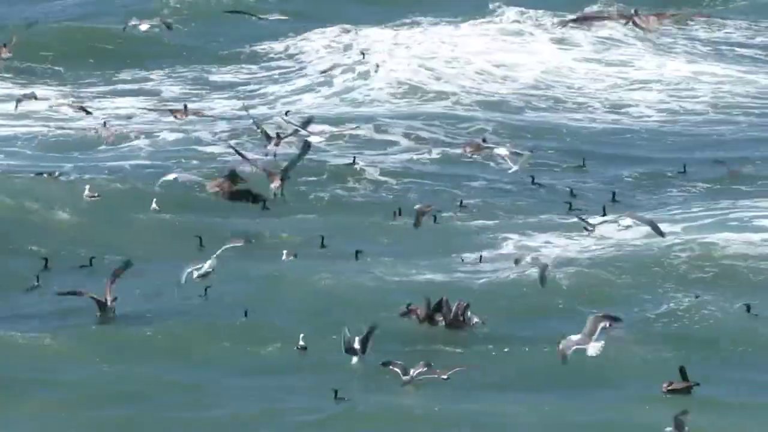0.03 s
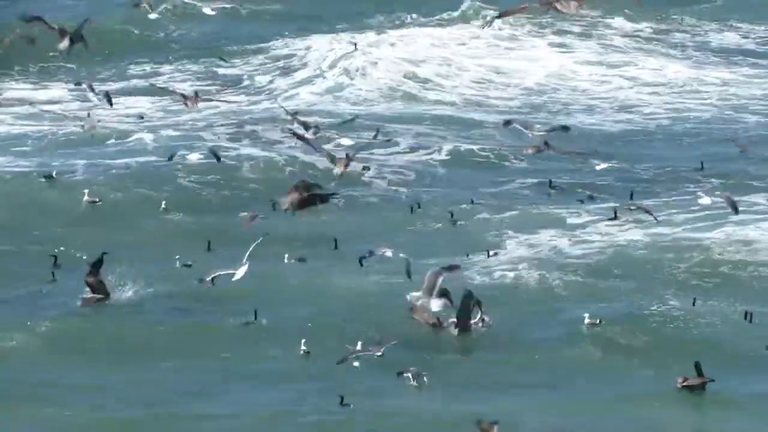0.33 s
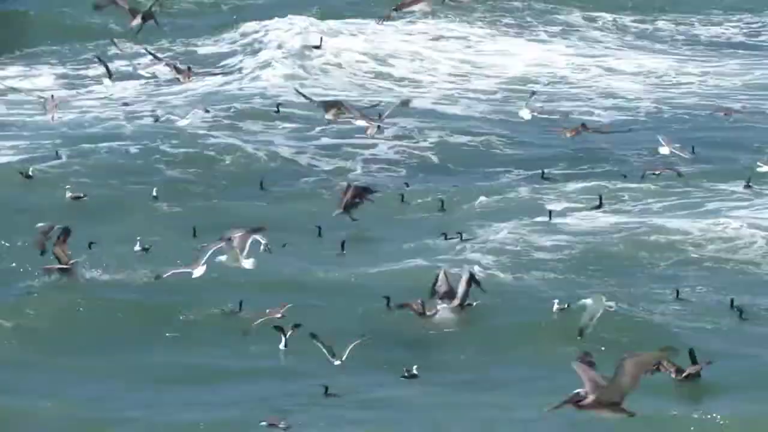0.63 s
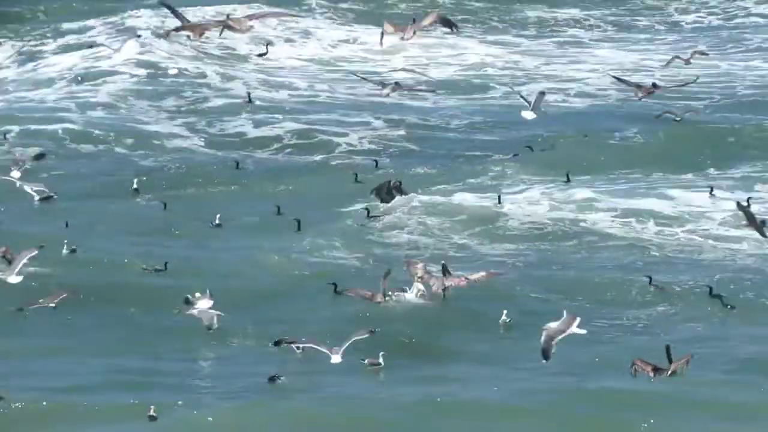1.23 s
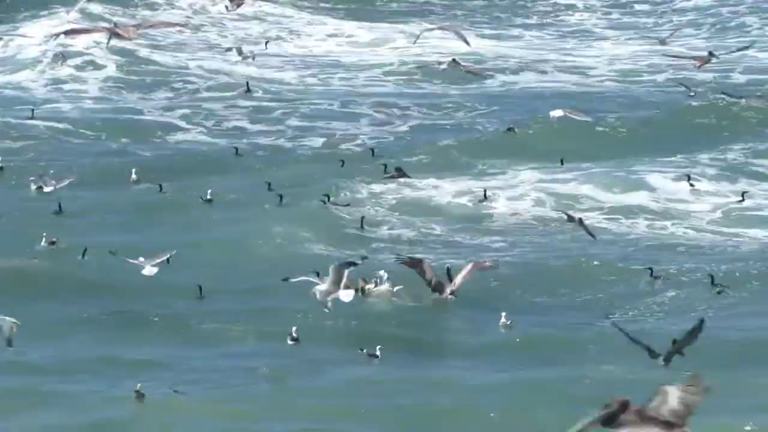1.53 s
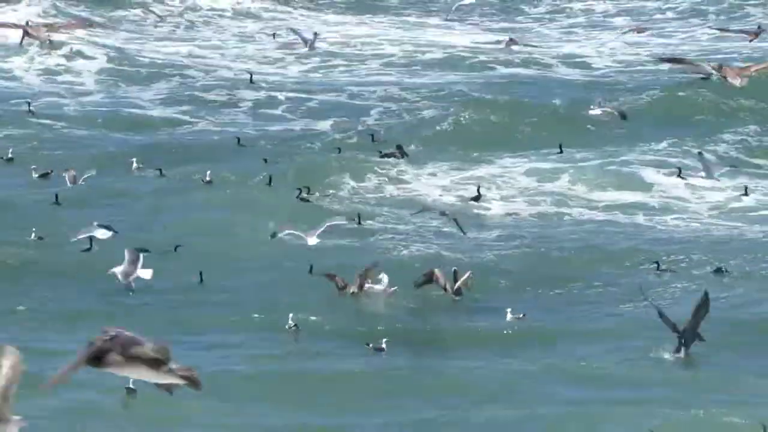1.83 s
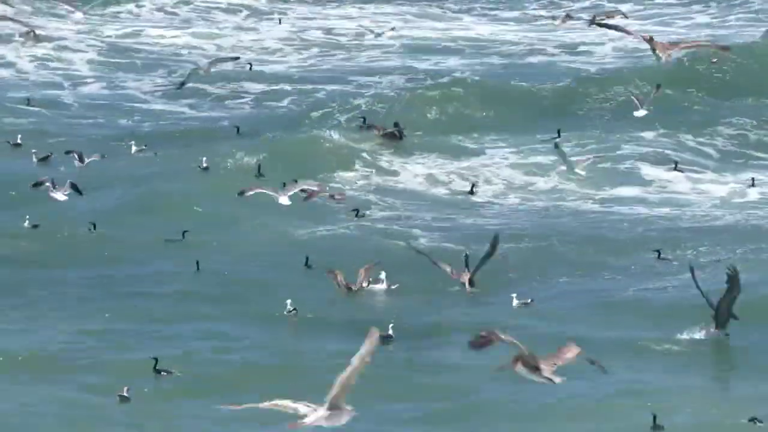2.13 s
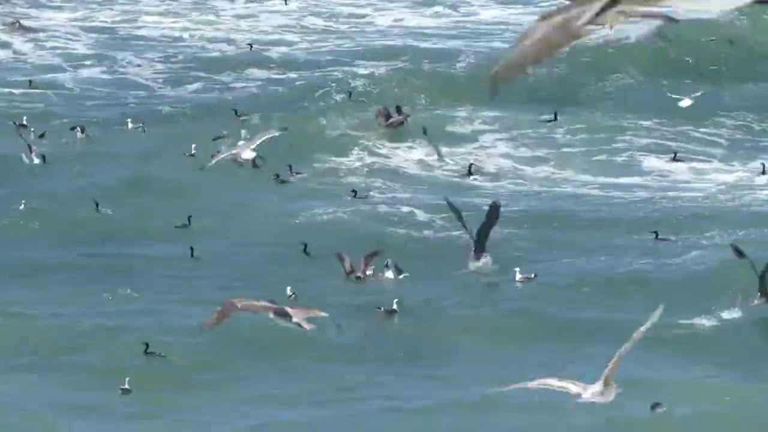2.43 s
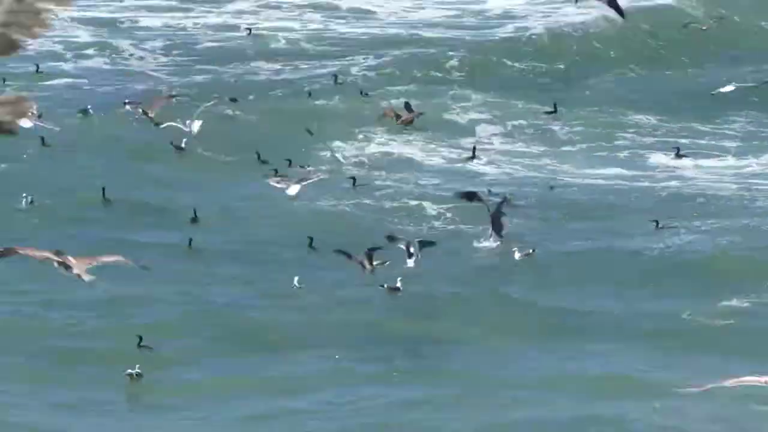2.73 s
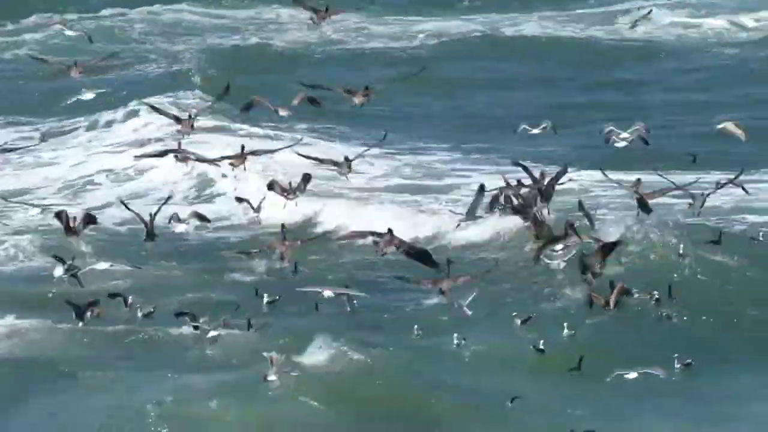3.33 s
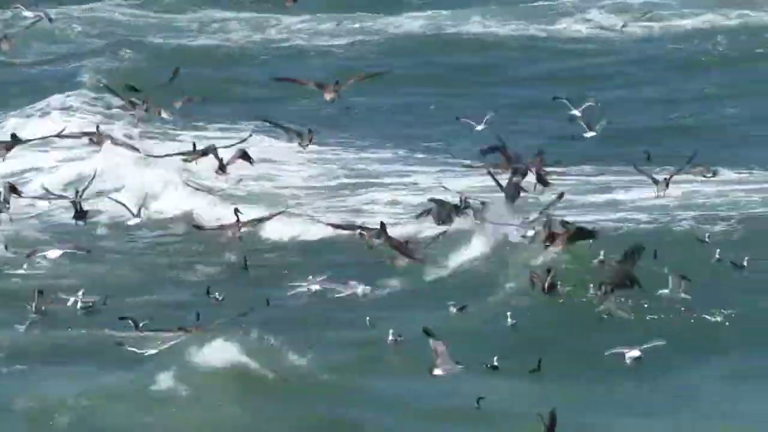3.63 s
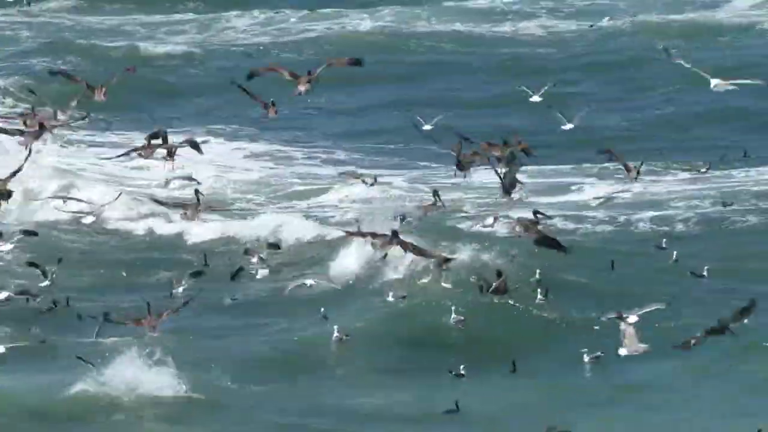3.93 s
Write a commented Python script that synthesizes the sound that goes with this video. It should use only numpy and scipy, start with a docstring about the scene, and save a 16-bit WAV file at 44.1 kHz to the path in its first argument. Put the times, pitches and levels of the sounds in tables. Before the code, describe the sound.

Wind rumbles and thumps on the microphone over the steady wash of distant breaking waves.

```python
"""A shore where seabirds feed, heard through a stereo microphone out in gusty wind.
Eddies buffet the microphone, rumbling in nearly opposite phase left and right, brighter in strong gusts.
Farther off, breakers roar and their foam hisses; three faint bird calls carry over the water.
The recorder drops out for a fifth of a second and returns on the louder splash of a nearer wave."""
import sys
import numpy as np
from scipy import signal
from scipy.fft import rfft, irfft
from scipy.io import wavfile
from scipy.ndimage import uniform_filter1d, minimum_filter1d

SR = 44100
rng = np.random.default_rng(int(sys.argv[2]) if len(sys.argv) > 2 else 0)


def master_out(mix):
    """Clip the mix to full scale and print it as 16-bit PCM to the path in sys.argv[1]."""
    frames = np.transpose(np.atleast_2d(mix))
    ceiling = np.clip(frames, -1, 1)
    pcm = np.round(ceiling * 32767).astype(np.int16)
    wavfile.write(sys.argv[1], SR, pcm)


N = 176400
DROPOUT_FROM_S, DROPOUT_TO_S = 2.637, 2.839
OPPOSITE = np.array([[1], [-1]])  # signs for left and right


def wind(t):
    """Gusts on the microphone drive a deep throb, a rumble and, more steeply, a rasp of small eddies."""
    # wind strength at the microphone: t/s, level/dB
    gust_level = [(0, -32.5), (.1, -30.5), (.16, -28.5), (.3, -25.5), (.38, -26.5), (.5, -21), (.55, -26),
                  (.63, -20.5), (.7, -19), (.77, -18), (.84, -23.5), (.95, -24), (1.03, -22), (1.09, -20),
                  (1.235, -17.5), (1.28, -26.5), (1.35, -20.5), (1.39, -20.5), (1.44, -22), (1.61, -28),
                  (1.91, -28), (1.99, -30), (2.13, -19.5), (2.3, -18), (2.38, -26), (2.44, -20),
                  (2.51, -28), (2.64, -27.5), (2.84, -21), (2.94, -16.5), (2.985, -20), (3.08, -22),
                  (3.13, -23.5), (3.26, -30), (3.3, -19), (3.38, -22.5), (3.46, -20), (3.535, -16),
                  (3.56, -19.5), (3.72, -24.5), (3.8, -18.5), (3.875, -26.5), (3.91, -20), (4.0, -20.5)]
    # side the wind favours: t/s, left minus right/dB
    wind_lean = [(0, -3.5), (.4, 0), (.8, -3), (1.15, -1), (1.4, -3), (1.75, -5.5), (2.15, 1.5), (2.45, -5),
                 (2.85, -6), (3.4, -5.5), (3.6, -4), (4.0, -7)]
    # spectra of the three wind bands: f/Hz, relative density/dB
    throb_spectrum = [(20, -20), (45, -3), (80, 0), (130, -6), (250, -9)]
    rumble_spectrum = [(12, -30.5), (22, -13), (45, -5.5), (80, -2.5), (130, -1.5), (230, -4.5), (400, -13),
                       (560, -26), (800, -27), (1400, -55.5)]
    rasp_spectrum = [(120, -25.5), (300, 5.5), (500, 0.5), (700, -9), (1000, -17.5), (1500, -34),
                     (3000, -41.5), (6000, -56.5)]
    gust_db = curve(gust_level)
    late = t > DROPOUT_FROM_S  # after the dropout: more throb, less rumble and rasp
    throb = turbulence(throb_spectrum) * undb(gust_db + np.where(late, 0, -7.5))
    rumble = turbulence(rumble_spectrum) * undb(gust_db + np.where(late, 1.61, 2.65))
    pivot_db, rasp_growth = -21, 1.4  # growth in dB of rasp per dB of gust
    rasp_db = pivot_db + rasp_growth * (gust_db - pivot_db) + np.where(late, -11, -5.5)
    rasp = turbulence(rasp_spectrum, flutter_db=7) * undb(rasp_db)
    return (throb + rumble + rasp) * pan(curve(wind_lean))


def buffets(t):
    """Single hard eddies hit the microphone, swing the pressure fastest at their height and tear the air."""
    # eddies: t/s, peak level/dB, nominal f/Hz, half length/ms, left minus right/dB
    eddies = [(.136, -13, 250, 1.8, 6.5), (0.358, -9, 225, 5.7, 3.5), (.613, -8, 200, 2.8, 0.5),
              (0.686, -5.5, 318, 1.4, 0.5), (.746, -4, 125, 2.4, -3.5), (.787, -8, 270, 2.2, -3),
              (.801, -9.5, 450, 0.73, -8), (.876, -8.5, 140, 2.4, -4), (.998, -9.5, 197.5, 3.4, -6),
              (1.068, -4, 250.5, 1.26, 5), (1.216, -7.5, 250, 1.6, 0), (1.245, -12, 580, 1.4, 6),
              (1.254, -4, 289.3, 1.14, 5), (1.314, -9, 198.5, 1.4, -4), (1.404, -9, 268.6, 2.3, -7.5),
              (2.185, -12.5, 268.3, 2.1, 8), (2.334, -9.5, 268, 1.9, 4.5), (2.425, -9.5, 359, 1.55, 7),
              (2.597, -8.5, 179.9, 2.5, -4), (2.88, -6.5, 282.2, 1.55, -5.5),
              (2.942, -6.5, 189.8, 1.6, -11), (2.96, -3, 310, 1.64, -5), (3.065, -6.5, 183.4, 2.1, -5.5),
              (3.174, -10, 149.2, 3.7, -5.5), (3.303, -7.5, 290, 1.94, -7), (3.351, -8, 230, 2.2, -2),
              (3.391, -8, 100, 4.6, -4), (3.415, -3, 194.5, 2.1, -6), (3.498, -8, 260.7, 2.15, -7.5),
              (3.52, -5, 120, 3.6, -2), (3.602, -8.5, 430, 0.74, -7), (3.839, -6.5, 205, 3, -5),
              (3.974, -6.5, 150, 1.6, -1.5)]
    # torn air: f/Hz, relative density/dB
    tear_spectrum = [(200, -12.5), (400, -0.5), (800, 0), (1100, -13), (2000, -28.5), (4000, -40)]
    swings, total_force = np.zeros((2, N)), np.zeros((2, N))
    start_cycles = rng.random(len(eddies))
    lag_cycles = np.array([[0], [.42]])  # the right side swings nearly opposite to the left
    for (at, db, hz, half_ms, lean_db), start_cycle in zip(eddies, start_cycles):
        swell = 1 / np.cosh(np.clip((t - at) * 1000 / half_ms, -30, 30))
        cycles = start_cycle + np.cumsum(hz * (.6 + .65 * swell)) / SR
        force = undb(db) * swell * pan(lean_db)
        swings += force * np.sin(2 * np.pi * (cycles - lag_cycles))
        total_force += force
    tearing = total_force * undb(-17) * turbulence(tear_spectrum)
    return swings + tearing


def turbulence(spectrum, flutter_db=2.5):
    """Fluttering air pressure at the microphone, mostly opposite on its two sides."""
    own_share = .48
    shared = OPPOSITE * rng.standard_normal(N)
    own = own_share * rng.standard_normal((2, N))
    pressure = (shared + own) / np.hypot(1, own_share)
    return colour(pressure * flutter(rate_hz=90, depth_db=flutter_db), spectrum)


def surf():
    """Distant breakers swell and sink, their foam hisses, and a nearer wave splashes."""
    # breakers, foam and nearer wave: f/Hz, relative density/dB
    roar_spectrum = [(100, 1), (400, 2.5), (700, -1.6), (970, 2.1), (1300, -4.5), (1650, -2), (2300, -2.5),
                     (3200, -8.5), (4500, -20.5), (7000, -32)]
    foam_spectrum = [(2000, -3), (3200, -6.5), (4300, -0.5), (5500, -2.5), (6600, -1), (7700, 0),
                     (9000, -3.5), (10000, -10.5), (11000, -14.5)]
    splash_spectrum = [(700, -4.5), (1300, -7), (1800, -1.5), (2250, 0), (2800, -7.5), (3800, -11),
                       (5000, -18), (8000, -20.5)]
    # rise and fall of each: t/s, level/dB
    roar_level = [(0, -35), (.4, -33.5), (.68, -33), (1.1, -35.5), (1.5, -37.5), (2.0, -35), (2.6, -33),
                  (2.84, -41), (2.98, -32.5), (3.1, -34), (3.37, -33), (3.54, -39), (3.78, -36), (4.0, -38)]
    foam_level = [(0, -46), (.65, -44), (1.1, -47), (1.5, -49), (2.0, -45.5), (2.6, -41), (2.86, -46),
                  (3.0, -42.5), (3.35, -42), (3.55, -48), (3.78, -45), (4.0, -46)]
    splash_level = [(2.8, -60.5), (2.83, -22.5), (2.88, -28.5), (2.94, -29), (2.99, -37.5), (3.37, -35.5),
                    (3.54, -45), (3.7, -42.5), (4.0, -36.5)]
    roar = bubbles(roar_spectrum) * undb(curve(roar_level) + .5)
    foam = bubbles(foam_spectrum) * undb(curve(foam_level))
    splash = bubbles(splash_spectrum) * undb(curve(splash_level))
    return roar + foam + splash


def bubbles(spectrum):
    """Countless bubbles spread wide along the shore, gently churning."""
    # likeness of left and right: f/Hz, correlation (capped at 1 below)
    surf_likeness = [(200, 1.7), (900, 0), (1250, 0.27), (1600, 0.56), (2600, 0.03), (4300, 0.25),
                     (5700, -0.2), (7200, 0.08), (10000, -0.55)]
    # side the surf favours: f/Hz, left minus right/dB
    surf_lean = [(300, 6.5), (750, -4.5), (1250, 0), (2000, -2), (4300, -3.5), (6000, -2.5), (8000, 3),
                 (11000, -2.5)]
    likeness = np.clip(by_frequency(surf_likeness), -1, 1)
    mid, side = rfft(rng.standard_normal((2, N)))
    stereo = mid * np.sqrt((1 + likeness) / 2) + OPPOSITE * side * np.sqrt((1 - likeness) / 2)
    water = irfft(stereo * pan(by_frequency(surf_lean)), N)
    return colour(water, spectrum) * flutter(rate_hz=36, depth_db=.5)


def birds(t):
    """Faint seabirds to the left whistle short calls that scoop up to their pitch."""
    # calls: start t/s, length/s, f/Hz, level/dB
    calls = [(0.36, 0.055, 1473, -42.5), (2.114, 0.066, 1500, -41.5), (3.292, 0.037, 3132, -40.5)]
    scoop_depth, scoop_s, overtone_db = .019, .018, -26
    wobble = 1 + .0048 * np.log(flutter(rate_hz=200, depth_db=8.7))
    out = np.zeros(N)
    for start, length, hz, db in calls:
        age = np.clip(t - start, 0, length)
        pitch_hz = hz * wobble * (1 - scoop_depth * np.exp(-age / scoop_s))
        phase = 2 * np.pi * np.cumsum(pitch_hz) / SR
        swell = np.sqrt(2 * np.abs(np.sin(np.pi * age / length)))
        out += undb(db) * swell * (np.sin(phase) + undb(overtone_db) * np.sin(2 * phase))
    return out * pan(lean_db=5)


def undb(db):
    """Decibels to gain."""
    return 10 ** (np.asarray(db) / 20)


def curve(rows):
    """Rows of (t/s, value) joined by straight lines."""
    return np.interp(np.arange(N) / SR, *np.array(rows, float).T)


def by_frequency(rows):
    """Rows of (f/Hz, value) joined along a logarithmic frequency axis."""
    hz, value = np.array(rows, float).T
    bin_hz = np.arange(N // 2 + 1) * SR / N
    return np.interp(np.log(bin_hz + 1e-3), np.log(hz), value)


def colour(x, spectrum):
    """Give white noise a spectrum at the same power, falling 12 dB an octave above its last point."""
    bin_hz = np.arange(N // 2 + 1) * SR / N
    above_top = np.maximum(bin_hz / spectrum[-1][0], 1)
    gain = undb(by_frequency(spectrum)) / above_top ** 2
    return irfft(rfft(x) * gain / np.sqrt(np.mean(gain ** 2)), N)


def flutter(rate_hz, depth_db):
    """A randomly wandering gain of unit power that dips further than it swells."""
    span = max(int(SR / rate_hz), 2)
    walk = uniform_filter1d(uniform_filter1d(rng.standard_normal(N), span), span // 2)
    gain = undb(depth_db * np.minimum(walk / walk.std(), 1.35))
    return gain / np.sqrt(np.mean(gain ** 2))


def pan(lean_db):
    """Left and right gains at constant power for a level difference, left minus right."""
    gain = undb(OPPOSITE * lean_db / 2)
    return gain / np.sqrt(np.mean(gain ** 2, axis=0))


def scene():
    """Wind right on the microphone, with the sea and its birds beyond."""
    t = np.arange(N) / SR
    return wind(t) + buffets(t) + surf() + birds(t)


def record(dry):
    """The recorder drops out briefly, limits peaks at full scale and cuts the top."""
    fade_s, limiter_samples, top_hz = .0043, 441, 10900
    t = np.arange(N) / SR
    running = np.clip(np.maximum(DROPOUT_FROM_S - t, t - DROPOUT_TO_S) / fade_s, 0, 1)
    safe_gain = 1 / np.maximum(np.abs(dry).max(axis=0), 1)
    limiter = uniform_filter1d(minimum_filter1d(safe_gain, limiter_samples), limiter_samples)
    top_cut = signal.ellip(10, .1, 80, top_hz, fs=SR, output="sos")
    return signal.sosfilt(top_cut, dry * limiter * running)


dry = scene()
out = record(dry)
master_out(out)
```